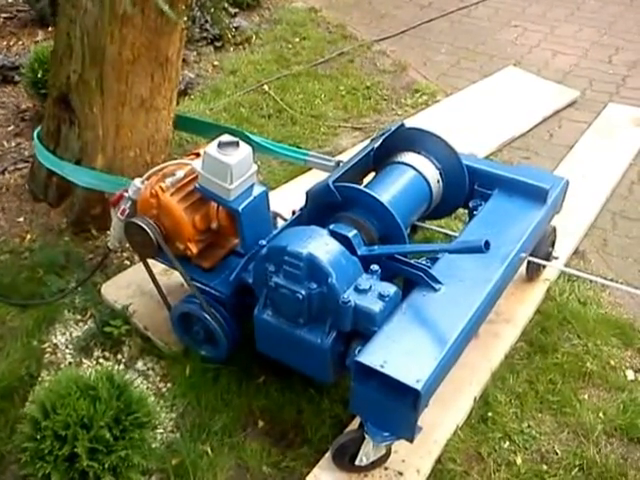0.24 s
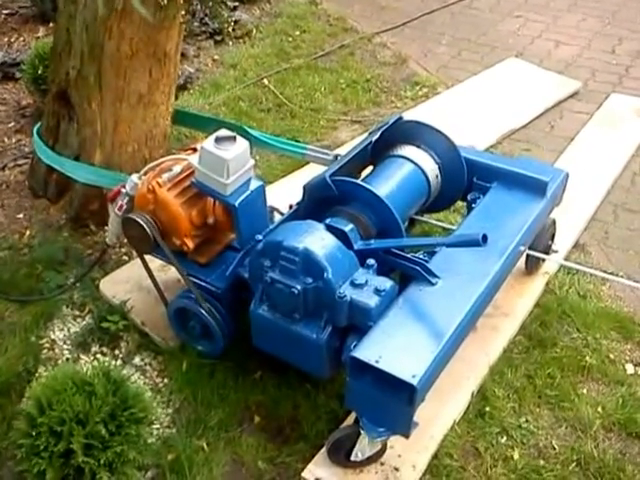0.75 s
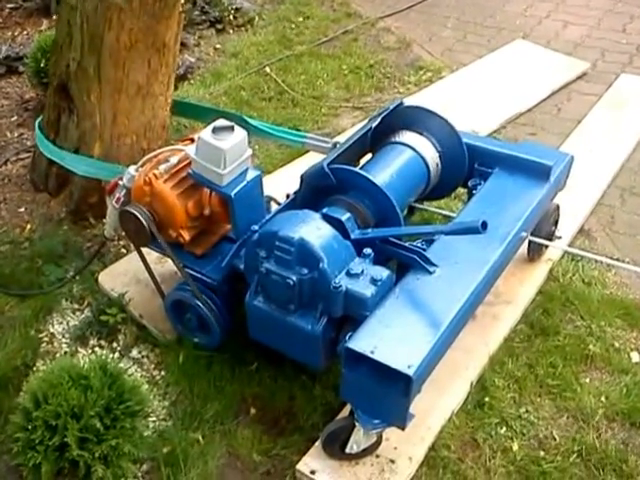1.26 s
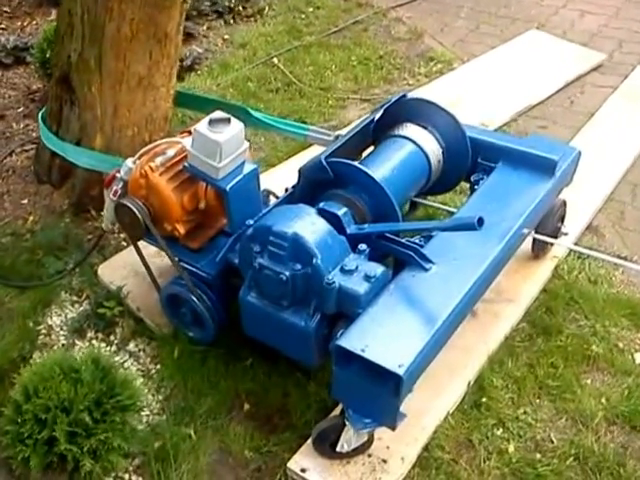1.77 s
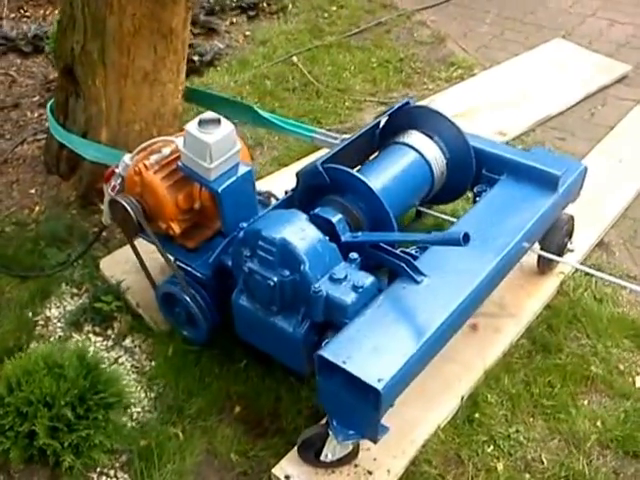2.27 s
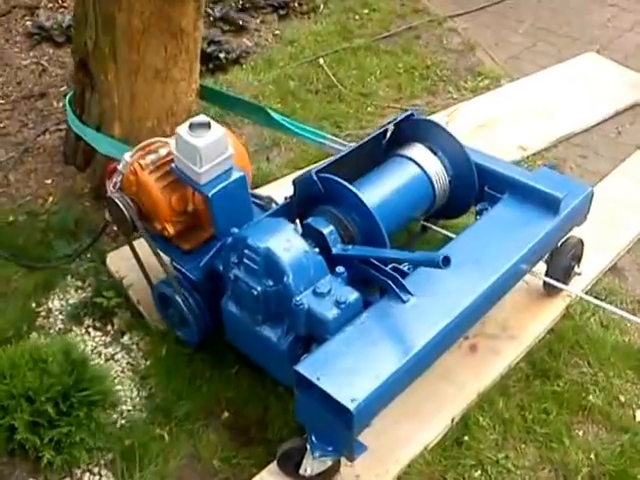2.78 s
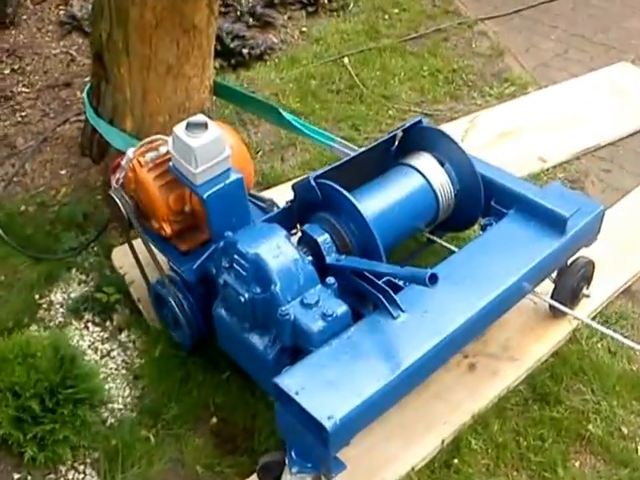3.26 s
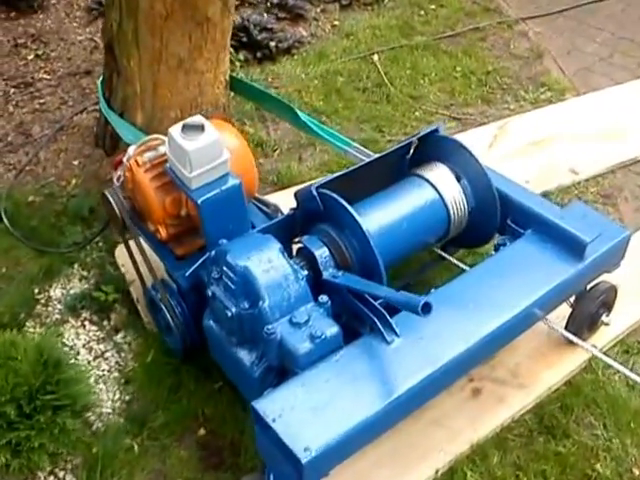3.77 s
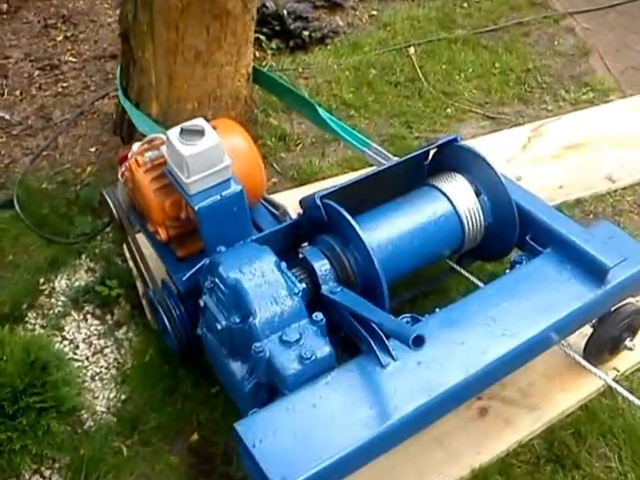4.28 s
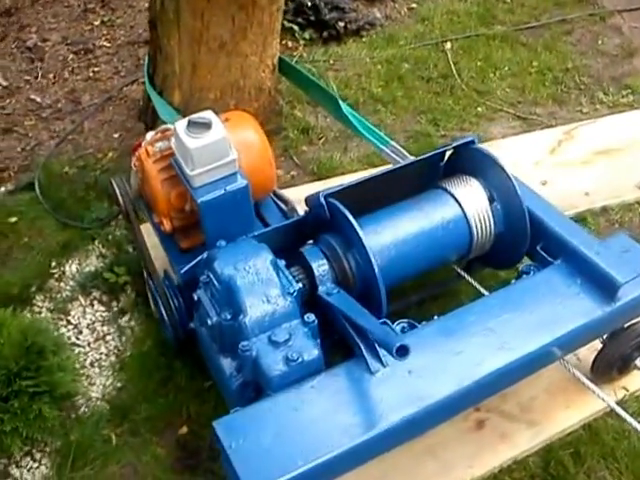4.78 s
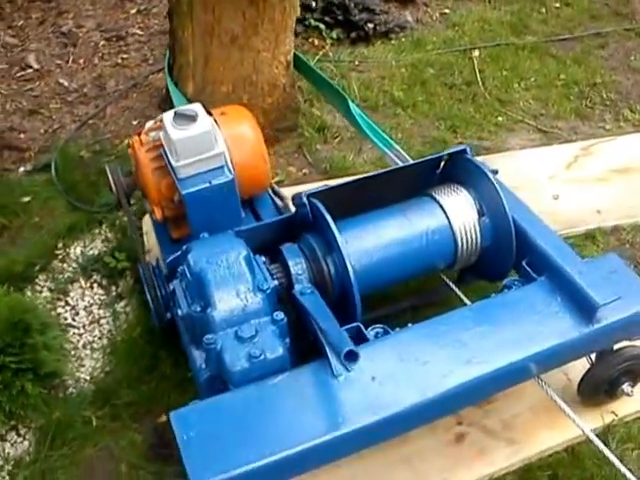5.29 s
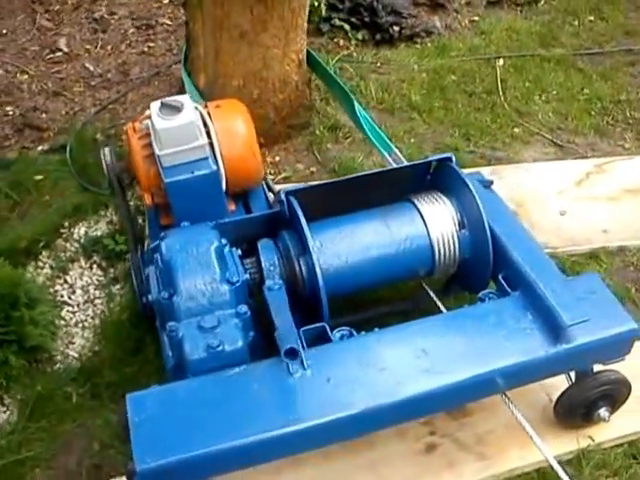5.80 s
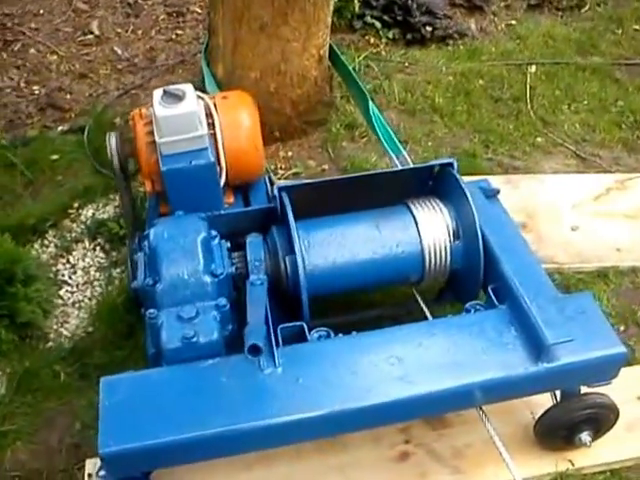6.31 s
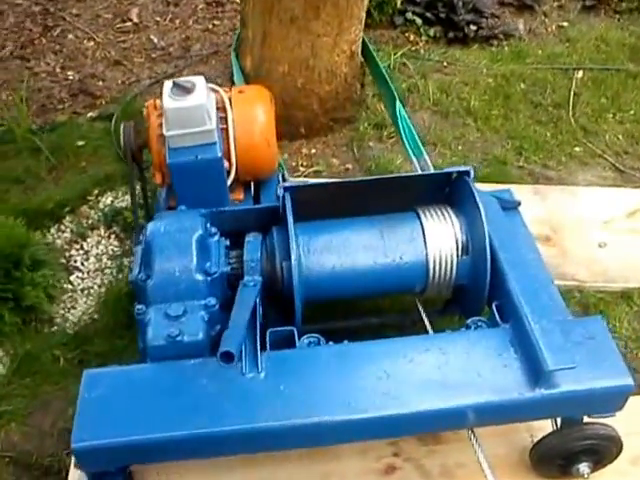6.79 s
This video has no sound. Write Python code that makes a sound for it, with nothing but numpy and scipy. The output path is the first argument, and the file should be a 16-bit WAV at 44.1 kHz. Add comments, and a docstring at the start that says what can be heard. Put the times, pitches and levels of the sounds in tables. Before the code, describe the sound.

Continuous harsh mechanical drone of a motorised cable winch, gritty gear noise and piercing whine, with thin belt squeak and a late low boom.

```python
"""An electric motor hums and whines as a home-built winch winds in its cable on a lawn.
Its lines are wavering sines; shaken noise rings a housing resonance around the whine.
Gears grind and hiss as shaped noise, and a V-belt's thin squeak, ringing noise, peaks on every pulley turn.
Steel panels swell one by one as the microphone is carried slowly round; running gear squeals and scrapes.
The frame drones and booms, and light air rumbles on the microphone."""
import sys
import numpy as np
from scipy import signal
from scipy.fft import rfft, irfft, next_fast_len
from scipy.io import wavfile
from scipy.ndimage import uniform_filter1d, map_coordinates

SR = 44100
rng = np.random.default_rng(int(sys.argv[2]) if len(sys.argv) > 2 else 0)


def store_wav(level_fs):
    """Save 16-bit WAV to argv[1]."""
    pcm = np.round(np.clip(np.atleast_2d(level_fs), -1, 1) * 32767)
    wavfile.write(sys.argv[1], SR, pcm.T.astype(np.int16))


N = 310905

MOTOR_HZ, PULLEY_HZ = 24.5, 14.75  # nominal turns a second, before the clock drifts


def amp(db):
    """Decibels to gain."""
    return 10 ** (np.asarray(db) / 20)


def unit(x):
    """Scale to rms 1."""
    return x / np.sqrt(np.mean(x ** 2) + 1e-20)


def white():
    """Plain white noise over the whole scene."""
    return rng.standard_normal(N)


def curves(rows):
    """One value per sample for each column after the time."""
    times, *columns = np.transpose(rows)
    return [np.interp(np.arange(N) / SR, times, column) for column in columns]


def wobble(rate):
    """A smooth random curve, rate knots a second."""
    knots = rng.standard_normal(int(N * rate / SR) + 4)
    return map_coordinates(knots, [np.arange(N) * rate / SR])


def swell(x, centre, spread):
    """A bell-shaped rise and fall; spread is its standard deviation."""
    return np.exp(-((x - centre) / spread) ** 2 / 2)


# the microphone's way round the winch (t/s, bearing/degrees)
MICROPHONE_WALK = [(0, 0), (2, 11), (5.5, 41), (7.05, 50)]


def along_walk(levels):
    """Gain that moves from a start level to an end level as the bearing turns."""
    bearing, = curves(MICROPHONE_WALK)
    ends = [MICROPHONE_WALK[0][1], MICROPHONE_WALK[-1][1]]
    return amp(np.interp(bearing, ends, levels))


def filtered(x, response):
    """Weight the spectrum of x by a response of frequency."""
    size = next_fast_len(N + SR // 2)  # padded against wrap-around
    spectrum = rfft(x, size) * response(np.fft.rfftfreq(size, 1 / SR))
    return irfft(spectrum, size)[:N]


def rush(spectrum, peaks=(), patchy_db=0):
    """Noise of rms 1 with a spectrum, resonant humps and narrow patches of colour that shift over time."""
    grid = signal.stft(white(), nperseg=2048)[2]
    field = rng.standard_normal(grid.shape)
    field = uniform_filter1d(field, size=2, axis=0)  # narrow in frequency
    field = uniform_filter1d(field, size=36, axis=1)  # slow in time
    noise = signal.istft(grid * amp(patchy_db * unit(field)), nperseg=2048)[1][:N]
    points_hz, points_db = np.transpose(spectrum)

    def response(hz):
        slope = np.interp(np.log(hz + 1), np.log(points_hz), points_db)
        humps = sum(db / (1 + (2 * (hz - centre) / width) ** 2) for centre, width, db in peaks)
        return amp(slope + humps)

    return unit(filtered(noise, response))


def ring(drive, modes):
    """Pass a drive through steep-sided resonances; rms 1."""
    def response(f):
        return sum(amp(db) / (1 + ((hz * hz - f * f) / (f * width + 1)) ** 2)
                   for hz, width, db in modes)

    return unit(filtered(drive, response))


def tone(turns, waver_db, stray):
    """A line of rms 1 whose strength and phase waver with the load and the reflections around it."""
    phase = 2 * np.pi * (turns + rng.random()) + stray * wobble(4)  # stray in radians
    flutter = wobble(1.5) + wobble(13)
    return unit(np.sin(phase) * amp(waver_db * unit(flutter)))


def fading_lines(rows, step_hz, clock, waver_db, stray):
    """A sum of lines at multiples of step_hz; each level slides evenly in dB from start to end."""
    return sum(amp(np.linspace(start, end, N)) * tone(multiple * step_hz * clock, waver_db, stray)
               for multiple, start, end in rows)


def once_a_turn(turns, sharp):
    """A smooth peak on every turn, rms 1."""
    return unit(np.exp(sharp * np.cos(2 * np.pi * turns)))


# motor lines (multiple of the shaft speed, start level/dB, end level/dB)
MOTOR_LINES = [(23, -36.5, -38), (24, -42, -45), (25, -41, -44), (26, -33, -39), (30, -39, -36.5),
               (31, -43, -44), (32, -32.5, -35)]
# reducer lines (multiple of the pulley speed, start level/dB, end level/dB)
REDUCER_LINES = [(10, -56, -40), (11, -44, -47), (14, -36.5, -42), (15, -43, -49), (16, -54, -44),
                 (18, -47, -42), (21, -50, -45), (36, -47, -47)]
# tones off the shaft orders (f/Hz, start level/dB, end level/dB)
HUM_LINES = [(36.8, -40, -43), (57.2, -37, -45), (253, -47, -42), (536.2, -44, -41), (566.5, -40, -40),
             (599.8, -44, -45), (675.3, -33, -45), (843.5, -43, -40), (1060.8, -43, -43),
             (1108, -43.5, -43), (1111.5, -42, -43), (1820, -50, -39), (1868.2, -45, -41),
             (2376.5, -50, -47), (3025.5, -49, -44)]


def drone(clock):
    """Lines from the motor shaft, the reducer's teeth and the rest of the drive."""
    motor = fading_lines(MOTOR_LINES, MOTOR_HZ, clock, waver_db=1.85, stray=0.34)
    gears = fading_lines(REDUCER_LINES, PULLEY_HZ, clock, waver_db=0.7, stray=0.21)
    hum = fading_lines(HUM_LINES, 1, clock, waver_db=1.5, stray=0.59)
    return motor + gears + hum


WHINE_HZ = 1602.7
SIDES_DB, SHAKE_DB = -4.5, -5.5  # side tones and shaken housing, relative to the throb
# the throb around the whine (t/s, level/dB)
WHINE_THROB = [(0.8, -25), (1.7, -23.5), (4.4, -19.5), (5.2, -25.5), (6.2, -18), (7.05, -22)]
# side tones (shaft speeds from the whine's centre, relative level/dB)
WHINE_SIDES = [(-2, -6.5), (-1, -6), (1, -10), (2, 0), (3, -7), (4, -6.5), (6, -4.5)]
# the centre tone along the walk (start level/dB, end level/dB)
WHINE_LEVELS = (-34, -21.5)


def whine(clock):
    """A high tone with side tones whole shaft speeds away, over a housing resonance shaken by the gears."""
    throb_db, = curves(WHINE_THROB)
    centre = tone(WHINE_HZ * clock, waver_db=1.1, stray=0.22)
    sides = unit(sum(amp(db) * tone((WHINE_HZ + k * MOTOR_HZ) * clock, waver_db=1.4, stray=0.36)
                     for k, db in WHINE_SIDES))
    shake = white() * once_a_turn(2 * MOTOR_HZ * clock, sharp=0.4)  # two peaks per shaft turn
    housing = ring(shake, [(1615, 170, 0)])
    throb = amp(throb_db) * (amp(SIDES_DB) * sides + amp(SHAKE_DB) * housing)
    # the load on the teeth rises and falls with each turn of the pulley
    load = once_a_turn(PULLEY_HZ * clock, sharp=0.17)
    return load * (along_walk(WHINE_LEVELS) * centre + throb)


# colours of grind, frame and hiss (f/Hz, relative level/dB per Hz)
GRIND_COLOUR = [(300, -26.5), (480, -10.5), (540, -1), (700, -4), (950, -5), (1250, -2), (1800, 0.5),
                (2150, 2.5), (2450, -3), (2900, -8.5), (3500, -9.5), (4200, -14), (5500, -63)]
FRAME_COLOUR = [(40, -20), (60, -2.5), (100, 8), (150, 3), (250, 5.5), (350, 3.5), (460, 1.5), (600, 0.5),
                (1000, -0.5), (1600, -33.5)]
HISS_COLOUR = [(2500, -19.5), (4000, 0.5), (4400, 5), (4850, -0.5), (5500, 6), (6000, 3), (6700, -0.5),
               (7800, -8), (8800, -28.5), (10500, -14.5), (12200, -51), (13900, -49)]
# resonances of the cast housing (f/Hz, width/Hz, hump level/dB)
HOUSING_MODES = [(1107, 21, 10.5), (1327, 190, 5), (1603, 195, 5.5), (1997, 150, 3), (2625, 58, 6),
                 (3020, 330, 5), (3370, 116, 5.5), (3655, 37, 7)]
# the three layers along the walk (start level/dB, end level/dB)
GRIND_LEVELS = (-18.5, -19.5)
FRAME_LEVELS = (-32, -27.5)
HISS_LEVELS = (-37.5, -37)


def gearbox(clock):
    """Teeth grind in the cast housing, the frame carries the low part, and sliding steel hisses on top."""
    grind = rush(GRIND_COLOUR, HOUSING_MODES, patchy_db=2.5)
    grind = grind * once_a_turn(MOTOR_HZ * clock, sharp=0.036)
    hiss = rush(HISS_COLOUR, patchy_db=3.0) * once_a_turn(PULLEY_HZ * clock, sharp=0.019)
    frame = rush(FRAME_COLOUR, patchy_db=2.26)
    return (along_walk(GRIND_LEVELS) * grind + along_walk(FRAME_LEVELS) * frame
            + along_walk(HISS_LEVELS) * hiss)


BEAM_DEG = 3.63  # standard deviation of a beam
# modes of the steel panels (f/Hz, width/Hz, level/dB on the beam's axis, beam bearing/degrees)
PANEL_MODES = [(57.5, 17, -34, 0.96), (211, 25, -39.5, 9.3), (420, 240, -36.5, 38.5),
               (890, 280, -25.5, 51.5), (946, 450, -26, 40.2), (1274, 88, -27.5, 1.3),
               (1380, 200, -27.5, 31), (1664, 40, -28.5, 12.3), (1900, 160, -28, 47.6),
               (2070, 106, -22.5, 31.8), (2100, 480, -23.5, 38.6), (2080, 300, -26, 15.3),
               (3450, 430, -31.5, 24), (5600, 1100, -41, 16.5)]


def panels():
    """Each panel mode radiates in a beam, so it swells and fades as the microphone goes by."""
    bearing, = curves(MICROPHONE_WALK)
    return sum(amp(db) * swell(bearing, beam, BEAM_DEG) * ring(white(), [(hz, width, 0)])
               for hz, width, db, beam in PANEL_MODES)


# squeak resonances (f/Hz, width/Hz, relative level/dB)
SQUEAK_MODES = [(8190, 250, 1.5), (9450, 240, -7), (10480, 110, -21), (12700, 300, -26), (13740, 130, -36)]
# the squeak along the walk (start level/dB, end level/dB)
SQUEAK_LEVELS = (-46.5, -51.5)


def belt(clock):
    """The belt slips in the pulley's groove with a thin squeak, hardest once a turn."""
    bite = once_a_turn(PULLEY_HZ * clock, sharp=12) * amp(1.2 * wobble(15))
    slip = 1 + 0.24 * bite
    return along_walk(SQUEAK_LEVELS) * ring(white() * slip, SQUEAK_MODES)


SQUEAL_WIDTH_HZ = 20
# brief thin squeals of the running gear (t/s, spread/s, f/Hz, level/dB)
GEAR_SQUEALS = [(5.6, 0.14, 5340, -42), (5.82, 0.11, 3036, -30.5), (6.23, 0.062, 3035, -33)]


def squeals():
    """Noise through narrow, high resonances that come and go."""
    t = np.arange(N) / SR
    return sum(amp(db) * swell(t, at, spread) * ring(white(), [(hz, SQUEAL_WIDTH_HZ, 0)])
               for at, spread, hz, db in GEAR_SQUEALS)


def scrape(at=3.5, spread=0.066, db=-56):
    """One faint, high scrape: a brief swell of noise through a broad resonance."""
    return amp(db) * swell(np.arange(N) / SR, at, spread) * ring(white(), [(11200, 1600, 0)])


OCTAVE_DB = -11  # the boom's octave, relative to the boom
AIR_DB = -36.5  # middle level, around which the air wavers
# level of the frame's boom (t/s, level/dB)
BOOM_LEVEL = [(0, -40.5), (3.5, -41.5), (5.7, -33), (6.2, -30), (6.8, -28), (7.05, -39)]
# colour of the air (f/Hz, relative level/dB per Hz)
AIR_COLOUR = [(10, -16), (25, 2), (40, 7.5), (60, 6.5), (100, -8), (250, -59)]


def rumble(clock):
    """Air on the microphone and the low, beating boom of the frame on its planks."""
    boom_db, = curves(BOOM_LEVEL)
    steady = tone(5 * PULLEY_HZ * clock, waver_db=1.5, stray=0.8)
    boom = unit(steady + 0.7 * ring(white(), [(73, 14, 0)]))  # tone and noise beat together
    octave = ring(white(), [(145, 25, 0)])
    air = amp(AIR_DB + 0.9 * wobble(2)) * rush(AIR_COLOUR)
    return air + amp(boom_db) * (boom + amp(OCTAVE_DB) * octave)


def scene():
    """The turning parts share one clock, which drifts a little with the load on the cable."""
    speed = 1 + 0.0008 * wobble(1.5) + 0.0008 * wobble(12)
    clock = np.cumsum(speed) / SR
    drive = drone(clock) + whine(clock) + gearbox(clock)
    steel = panels() + belt(clock) + squeals() + scrape()
    return (drive + steel + rumble(clock))[None]


TOP_HZ = 13980  # band limit


def record(dry):
    """The recorder keeps nothing above its band limit."""
    return filtered(dry[0], lambda hz: hz < TOP_HZ)[None]


dry = scene()
out = record(dry)
store_wav(out)
```